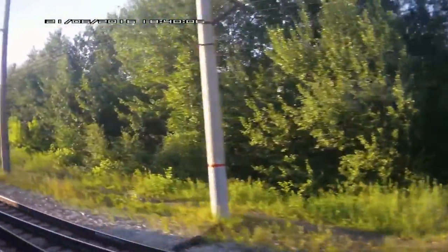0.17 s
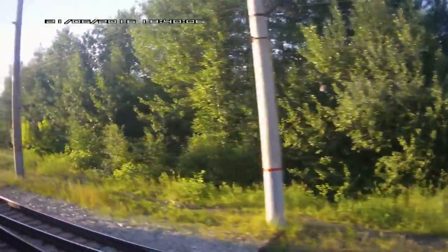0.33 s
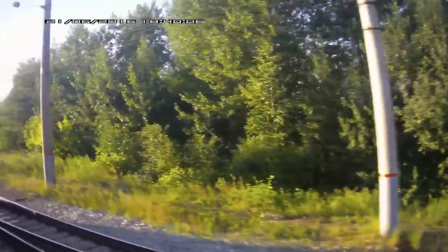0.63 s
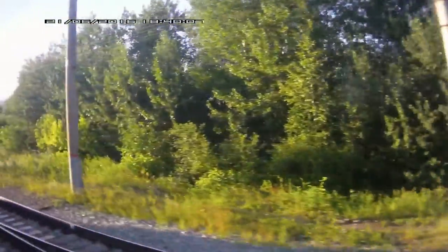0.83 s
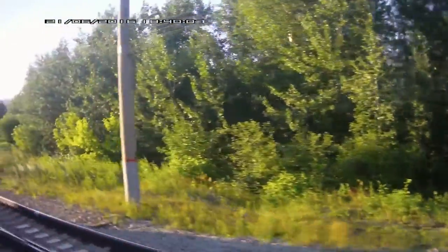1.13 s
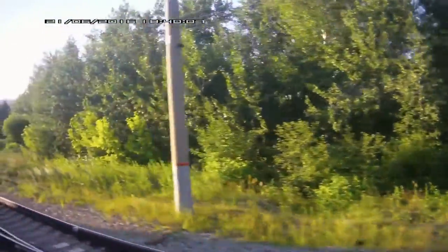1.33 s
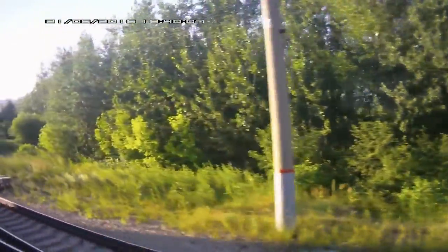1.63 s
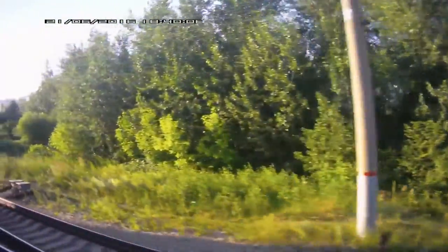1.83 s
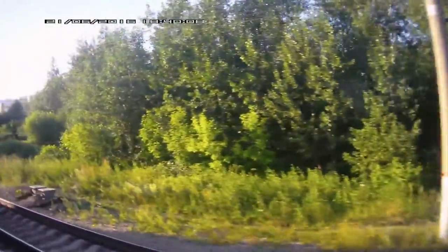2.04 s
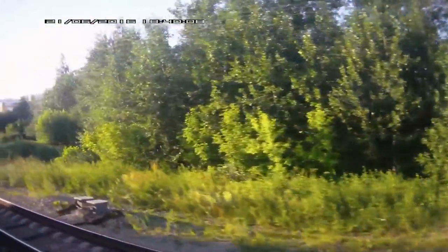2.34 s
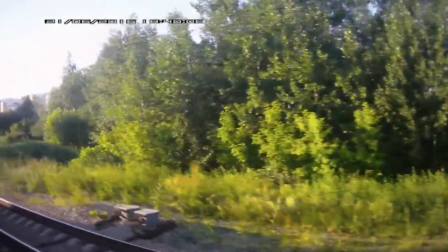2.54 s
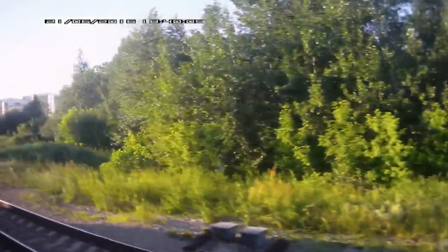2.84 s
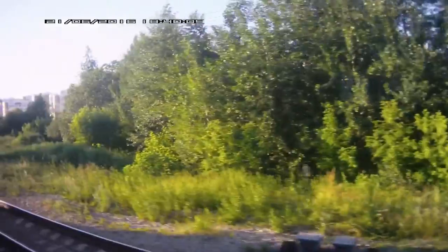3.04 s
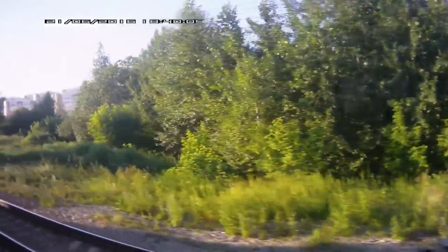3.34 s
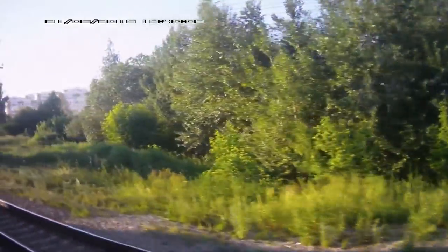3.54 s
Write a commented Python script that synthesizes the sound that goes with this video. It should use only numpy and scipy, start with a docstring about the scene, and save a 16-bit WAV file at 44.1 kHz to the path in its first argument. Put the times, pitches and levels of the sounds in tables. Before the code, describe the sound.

Inside a moving passenger train, a deep uneven floor rumble and faint hiss continue throughout; a hard rattling knock comes almost immediately, followed by light ticks, brief panel buzzes and soft late bumps, picked up near the window.

```python
"""A deep, uneven floor rumble and a thin hiss fill a rolling passenger carriage, nearly mono.
Noise coloured by spectrum tables makes the rumble, wheel roar and hiss. One hard knock and softer ones
excite decaying body modes and a noise clatter; close sine tones beat as a loose panel buzzes.
Enveloped noise and unsteady sines make ticks, crackles, rustles and squeaks; the cabin reverberates.
A small camera near the window cuts the top of the treble."""
import sys
import numpy as np
from scipy import signal
from scipy.fft import rfft, irfft
from scipy.io import wavfile
from scipy.ndimage import uniform_filter1d

SR = 44100
rng = np.random.default_rng(int(sys.argv[2]) if len(sys.argv) > 2 else 0)


def waveform_to_disk(signal):
    """Save audio, clipped to [-1, 1], as 16-bit WAV at the path in sys.argv[1]."""
    frames = np.transpose(np.atleast_2d(signal))
    scaled = np.clip(frames, -1, 1) * 32767
    samples = np.round(scaled).astype(np.int16)
    wavfile.write(sys.argv[1], SR, samples)


N = 163170  # length in samples

# Spectrum of the rolling noise. Each row: frequency in Hz, relative density in dB per Hz.
ROLLING_SPECTRUM = [(9, -29), (15, -8.5), (38, 1), (108, -6.5), (182, -18), (233, -23.5), (273, -17.5),
                    (313, -21.5), (411, -24.5), (470, -31.5), (908, -34.5), (1020, -42), (1600, -47),
                    (2500, -46.5), (3050, -44), (3350, -53.5), (3900, -61), (6000, -86)]
# Level course of the deep rumble, used relative to its median. Each row: time in seconds, level in dB.
RUMBLE_SWELL = [(0.299, -27), (0.75, -33), (0.83, -26), (1.31, -30), (1.37, -25), (1.44, -35),
                (1.52, -26.5), (1.62, -29), (2.28, -26.5), (2.38, -32.5), (2.57, -26.5), (2.96, -29.5),
                (3.2, -24.5), (3.23, -33.5), (3.42, -30), (3.7, -27.5)]
# Spectrum of the treble hiss. Each row: frequency in Hz, relative density in dB per Hz.
HISS_SPECTRUM = [(3000, -28), (3800, -5), (5000, -6), (6800, -4.5), (8500, -2), (9400, -4), (10200, -8),
                 (13000, -10.5), (15000, -17)]
# Grainy treble bursts. Each row: start in seconds, length at half height in seconds, level in dB before
# the fades, pitch in Hz about which the upper band lies.
RUSTLES = [(.24, 0.075, -72, 8500), (0.248, 0.1, -58.5, 3010), (0.887, 0.12, -67.5, 8300),
           (1.812, 0.061, -71, 8650), (1.95, 0.094, -74, 8600), (2.259, .12, -71, 12600),
           (2.942, 0.044, -68.5, 7150), (2.929, 0.047, -54.5, 2960), (3.457, 0.021, -52.5, 3000),
           (3.398, 0.035, -61, 8800), (3.455, 0.042, -64, 8350)]
# High notes. Each row: peak time in seconds, rise in seconds, time to fall 60 dB in seconds,
# pitch in Hz, level in dB, fall of the pitch while dying in percent.
SQUEAKS = [(3.285, 0.033, 0.027, 7800, -51, 0), (3.545, .015, .11, 4520, -56, 7),
           (3.542, .006, .07, 9050, -55, 3)]
# Treble snaps of the knocks and some lone ones. Each row: start in seconds, peak level in dB.
CRACKLES = [(.110, -46), (.128, -33.5), (.134, -35), (0.14, -46), (.154, -42.5), (.168, -44), (0.188, -48),
            (.223, -51), (1.812, -50.5), (2.686, -51.5), (3.124, -50), (3.484, -47)]
# Blows on small fittings. Each row: start in seconds, peak of the body in dB, pitch in Hz,
# peak of the bright edge in dB relative to the body.
TICKS = [(0.0537, -41, 1340, -27.5), (0.8975, -41.5, 1290, -22), (1.0034, -42.5, 1310, -19),
         (1.114, -43, 1540, -22), (1.1438, -43, 1830, -24), (1.8059, -37.5, 2160, -26),
         (1.8122, -41, 2620, -6), (1.896, -45.5, 1420, -22), (2.4077, -53, 2920, -14),
         (2.6865, -38.5, 1320, -17), (2.805, -45.5, 2780, -18), (2.926, -43.5, 2930, -24.5),
         (3.0123, -41.5, 2310, -22), (3.11, -42, 2600, -26), (3.404, -40, 2030, -20),
         (3.485, -45, 2650, -20), (3.535, -41.5, 2730, -20)]
# Panel buzzes. Each row: start in seconds, length at half height in seconds, level in dB before the fades.
BUZZES = [(0.545, 0.14, -53.5), (1.368, 0.19, -50), (2.358, 0.091, -47.5), (2.466, 0.1, -46),
          (3.396, 0.061, -50)]
# Modes of the carriage body. Each row: frequency in Hz before detuning, relative peak level in dB,
# time to fall 60 dB in seconds.
BODY_MODES = [(32.4, -5, 0.27), (69.8, -1.5, 0.35), (104, -1.5, 0.23), (132.8, -1.5, 0.24),
              (164.8, 6.5, 0.11), (243.5, -14, 0.11), (332.5, -13.5, 0.37), (531, -17.5, 0.13),
              (700.5, -8, 0.12), (780, -14.5, 0.12), (912, -16, 0.13), (957, -20.5, 0.077),
              (1128, -24, 0.14), (1273, -31, 0.048), (1658, -27, 0.074)]
# Blows on the body. Each row: start in seconds, level in dB added to that of each mode, decay constant
# of the push in ms, tilt over the modes in dB per octave, clatter level in dB before its envelope.
KNOCKS = [(0.095, -21.5, 2.8, 5.5, -24.5), (.112, -18.5, 12, 3, -23.5), (.127, -8.5, 13, 1.5, -13.5),
          (.155, -20.5, 9.8, 1.5, -22), (.185, -24.5, 13, -5.5, -22.5), (.203, -23.5, 6.4, -1.5, -30),
          (.262, -26.5, 7.4, 0.5, -30), (.284, -27, 10, -0.5, -31), (2.685, -40.5, 3, 5, -34.5),
          (3.372, -26, 5.4, -3, -37), (3.403, -43, 7.1, 3.5, -29), (3.424, -27.5, 11, -5, -36),
          (3.482, -34, 12, 0, -42), (3.543, -26, 7, 1, -41), (3.591, -41, 4.5, -1.5, -37.5)]
# Spectrum of the clatter. Each row: frequency in Hz, relative density in dB per Hz.
CLATTER_SPECTRUM = [(100, 4.5), (150, 3.5), (500, -5.5), (900, -13), (1700, -21), (2500, -21.5),
                    (3100, -25.5), (3700, -37), (5000, -51), (9000, -54), (15000, -73)]

ROLLING_DB, DEEP_BELOW_HZ = -28, 140  # level before the swell; slices centred below this swell
HISS_DB = -70.5
HISS_SIDE_DB, SIDE_TILT_DB = -8, 0.5  # side gain at 8 kHz; its tilt per octave
CRACKLE_DECAY_MS = 2.2
TICK_T60_S, TICK_DECAY_MS = .014, 7.2
TICK_EDGE_HZ = (8731.2, 9587.2)
BUZZ_HZ, BUZZ_BEAT_HZ, BUZZ_EDGE_S = 908, 32.7, 0.023
PUSH_SOFT_MS = 3  # the roughness of a push is weaker this long
DETUNE = .012  # relative spread of the modes from blow to blow
LOWS_LATE_CYCLES = .7  # each mode starts late by this many of its nominal periods
CLATTER_T60_S, CLATTER_RISE_MS = 0.16, 4.6
CLATTER_STROKES_HZ, CLATTER_UNEVEN_DB = 130, 2.5
CABIN_T60_S, CABIN_DB = .25, -10
TOP_HZ = 15050


def undb(db):
    """Decibels are twenty times the logarithm of an amplitude ratio; invert that."""
    return 10 ** (np.asarray(db) / 20)


def level(x, db):
    """The root mean square measures a signal's strength; scale it to db."""
    return x * undb(db) / np.sqrt(np.mean(x ** 2))


def colour(table, hz):
    """A spectral envelope: gain at hz, interpolated in dB over log frequency."""
    rows = np.array(table)
    log_hz = np.log(np.maximum(hz, 1))
    return undb(np.interp(log_hz, np.log(rows[:, 0]), rows[:, 1]))


def walk(rate_hz):
    """Slow random modulation: levels held 1 / rate_hz seconds, then smoothed by two running means."""
    hold = int(SR / rate_hz)
    steps = np.repeat(rng.standard_normal(N // hold + 1), hold)
    smooth = uniform_filter1d(uniform_filter1d(steps, hold), hold)
    return 1.26 * smooth[:N]  # restores a spread near 1


def ring(x, hz, t60):
    """A lightly damped resonator, a two-pole filter, answers its excitation x with one decaying mode."""
    radius = np.exp(-np.log(1000) / (t60 * SR))
    angle = 2 * np.pi * hz / SR
    return signal.lfilter([0, np.sin(angle)], [1, -2 * radius * np.cos(angle), radius ** 2], x)


def band(x, lo_hz, hi_hz):
    """A band-pass filter keeps the energy between two frequencies."""
    sos = signal.butter(2, [lo_hz, min(hi_hz, .45 * SR)], "band", fs=SR, output="sos")
    return signal.sosfilt(sos, x)


def gate(length, edge):
    """A trapezoidal envelope with linear fades, its length taken at half height."""
    t = np.arange(int((length + edge) * SR)) / SR
    return np.clip(np.minimum(t, length + edge - t) / edge, 0, 1)


def add(out, start_s, x):
    """Superposition: sounds add sample by sample."""
    i = int(start_s * SR)
    out[i:i + len(x)] += x[:N - i]


def flickering_bands(table, flicker_db):
    """Amplitude-modulated noise: half-octave slices flicker partly together, partly alone."""
    hz = np.arange(N // 2 + 1) * SR / N
    noise = rfft(rng.standard_normal(N)) * colour(table, hz)
    half_octaves = 2 * np.log2(np.maximum(hz, 1))
    shared = walk(17)
    for k in range(7, 29):
        # overlapping slices: neighbouring gains sum to one
        share = np.cos(np.pi / 2 * np.clip(half_octaves - k, -1, 1)) ** 2
        flicker = flicker_db * (walk(8.97) + 0.54 * shared)
        yield 2 ** (k / 2), irfft(noise * share, N) * undb(flicker)


def rumble_swell():
    """An amplitude envelope, linear in dB between its points, makes the deep rumble rise and dip."""
    rows = np.array(RUMBLE_SWELL)
    relative_db = rows[:, 1] - np.median(rows[:, 1])
    return undb(np.interp(np.arange(N) / SR, rows[:, 0], relative_db))


def rolling():
    """Broadband excitation: coloured noise gives the floor's rumble and the roar of wheel on rail."""
    swell = rumble_swell()
    slices = list(flickering_bands(ROLLING_SPECTRUM, 1.05))
    scale = undb(ROLLING_DB) / np.std(sum(x for _, x in slices))
    return scale * sum(x * (swell if hz < DEEP_BELOW_HZ else 1) for hz, x in slices)


def hiss():
    """Partial coherence: a thin hiss as common noise, with a weaker independent noise of opposite sign left and
    right."""
    mid = sum(x for _, x in flickering_bands(HISS_SPECTRUM, 0.99))
    side = np.zeros(N)
    for hz, x in flickering_bands(HISS_SPECTRUM, 1.2):
        side += x * undb(HISS_SIDE_DB + SIDE_TILT_DB * np.log2(hz / 8000))
    stereo = mid + side * np.array([[1], [-1]])
    return undb(HISS_DB) / np.std(mid) * stereo


def rustles():
    """Granular noise: fast random modulation makes broad treble bursts grainy."""
    out = np.zeros(N)
    for start, length, db, hz in RUSTLES:
        envelope = gate(length, 0.01)
        n = len(envelope)
        grain = rng.standard_normal(n) * undb(2.5 * walk(150)[:n])
        rustle = band(grain, hz * 0.9, hz * 1.03) + 0.37 * band(grain, 2300, hz)
        add(out, start, level(rustle, db) * envelope)
    return out


def squeaks():
    """Frequency and amplitude modulation: short high tones swell and die, slightly unsteady."""
    out = np.zeros(N)
    t = np.arange(SR // 4) / SR
    for peak_s, rise, t60, hz, db, fall in SQUEAKS:
        swelling = np.sin(np.pi / 2 * np.minimum(t / rise, 1)) ** 2
        shape = np.where(t < rise, swelling, undb(-60 * (t - rise) / t60))
        sag = fall / 100 * np.clip(3 * (t - rise) / t60, 0, 1) ** 2
        pitch = hz * (1 + 0.0072 * walk(180)[:len(t)] - sag)
        gain = undb(db + 3 * walk(123)[:len(t)])
        tone = np.sin(2 * np.pi * np.cumsum(pitch) / SR)
        add(out, peak_s - rise, gain * shape * tone)
    return out


def crackles():
    """Impulsive noise: rapidly decaying, band-limited bursts make tiny bright snaps."""
    out = np.zeros(N)
    t = np.arange(SR // 20) / SR
    for start, db in CRACKLES:
        burst = rng.standard_normal(len(t)) * np.exp(-t / (CRACKLE_DECAY_MS / 1000))
        snap = band(burst, 3300, 8500)
        add(out, start, undb(db) * snap / np.max(np.abs(snap)))
    return out


def ticks():
    """Resonant excitation: a short noise burst rings a small fitting and leaves a bright edge."""
    out = np.zeros(N)
    t = np.arange(SR // 10) / SR
    for start, db, hz, edge_db in TICKS:
        burst = rng.standard_normal(len(t)) * np.exp(-t / (TICK_DECAY_MS / 1000))
        resonance = level(ring(burst, hz, TICK_T60_S), 0)
        body = resonance + level(band(band(burst, 1200, 2580), 1100, 3700), 0)
        edge = band(burst, *TICK_EDGE_HZ)
        tick = body / np.max(np.abs(body)) + undb(edge_db) * edge / np.max(np.abs(edge))
        add(out, start, undb(db) * tick)
    return out


def buzz():
    """Beating: a loose panel sings on two close unsteady tones, with a weaker one below."""
    t = np.arange(N) / SR

    def note(hz, db):
        """A sine with random modulation of level and phase."""
        return undb(db + 1.9 * walk(40)) * np.sin(2 * np.pi * hz * t + 1.26 * walk(35))

    tone = level(note(BUZZ_HZ, 0) + note(BUZZ_HZ - BUZZ_BEAT_HZ, -4.5) + note(735, -8.5), 0)
    gain = np.zeros(N)
    for start, length, db in BUZZES:
        add(gain, start, undb(db) * gate(length, BUZZ_EDGE_S))
    return tone * gain


def push_forces(decay_ms, t):
    """Forced excitation: an impulse and decaying noise, low-passed, one independent push per mode."""
    push = rng.standard_normal((len(BODY_MODES), len(t))) * np.exp(-t / (decay_ms / 1000))
    push[:, :int(PUSH_SOFT_MS * SR / 1000)] *= .3
    push[:, 0] += 12
    return signal.sosfilt(signal.butter(4, 2400, fs=SR, output="sos"), push)


def clatter(db, t):
    """Random impacts: loose parts as coloured noise of uneven strength that rises fast and decays."""
    n = len(t)
    gains = colour(CLATTER_SPECTRUM, np.arange(n // 2 + 1) * SR / n)
    noise = level(irfft(rfft(rng.standard_normal(n)) * gains, n), db)
    strokes = level(undb(CLATTER_UNEVEN_DB * walk(CLATTER_STROKES_HZ)[:n]), 0)
    rise = 1 - np.exp(-t / (CLATTER_RISE_MS / 1000))
    return noise * strokes * undb(-60 * t / CLATTER_T60_S) * rise


def knocks():
    """Modal superposition: a rough push rings the body modes, the low ones late, and parts clatter."""
    out = np.zeros(N)
    t = np.arange(SR) / SR
    for start, db, push_ms, tilt_db, clatter_db in KNOCKS:
        pushes = push_forces(push_ms, t)
        shifts = DETUNE * rng.standard_normal(len(BODY_MODES))
        for push, (hz, mode_db, t60), shift in zip(pushes, BODY_MODES, shifts):
            note = ring(push, hz * (1 + shift), t60)
            peak_db = db + mode_db + tilt_db * np.log2(hz / 167)
            add(out, start + LOWS_LATE_CYCLES / hz, undb(peak_db) * note / np.max(np.abs(note)))
        add(out, start, clatter(clatter_db, t))
    return out


def cabin(events):
    """Reverberation: convolution with exponentially decaying noise gives the diffuse tail."""
    t = np.arange(SR // 2) / SR
    tail = rng.standard_normal(len(t)) * undb(-60 * t / CABIN_T60_S)
    unit_energy = tail / np.sqrt(np.sum(tail ** 2))
    return undb(CABIN_DB) * signal.fftconvolve(events, unit_energy)[:N]


def scene():
    """Superposition of the rolling background, the separate events and their reverberation."""
    background = rolling() + hiss()
    events = rustles() + squeaks() + crackles() + ticks() + buzz() + knocks()
    return background + events + cabin(events)


def record(dry):
    """Band limitation: the camera acts as a steep elliptic low-pass."""
    return signal.sosfilt(signal.ellip(10, .2, 80, TOP_HZ, fs=SR, output="sos"), dry)


dry = scene()
out = record(dry)
waveform_to_disk(out)
```